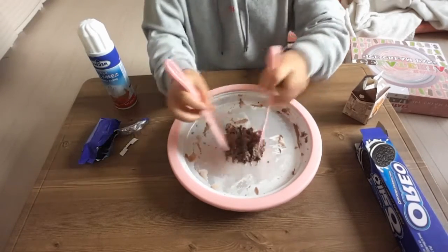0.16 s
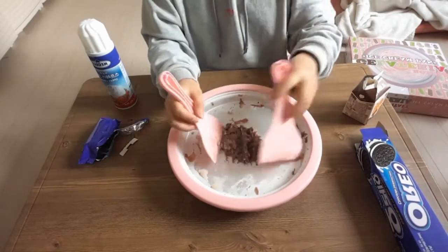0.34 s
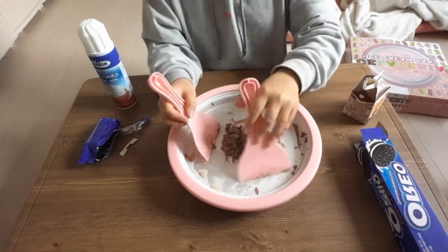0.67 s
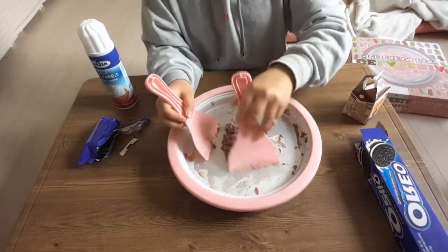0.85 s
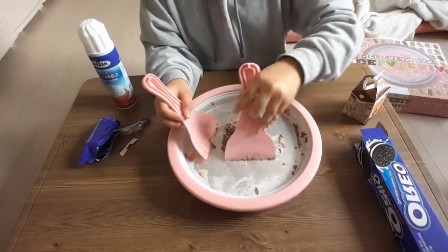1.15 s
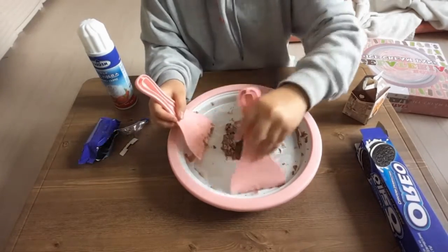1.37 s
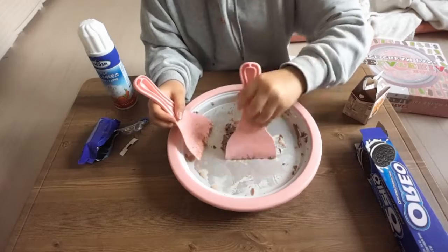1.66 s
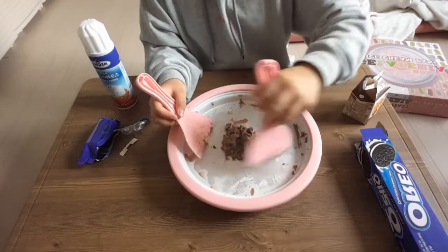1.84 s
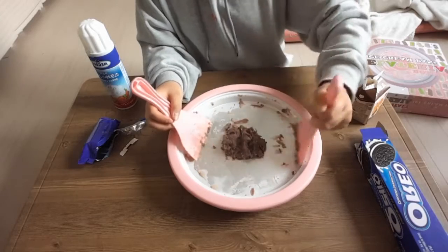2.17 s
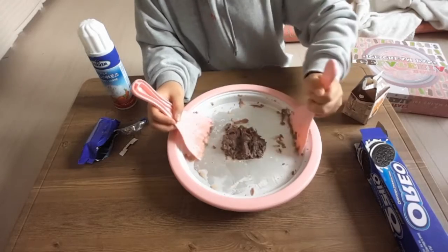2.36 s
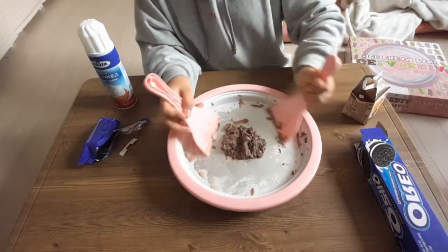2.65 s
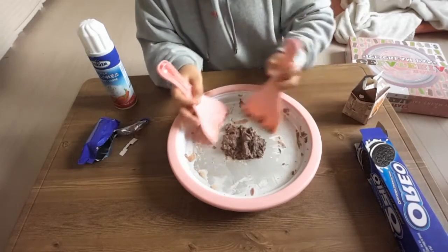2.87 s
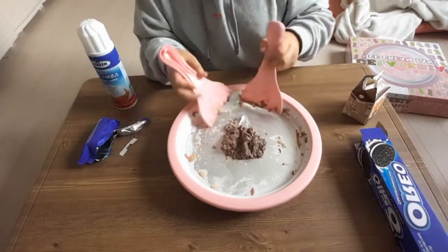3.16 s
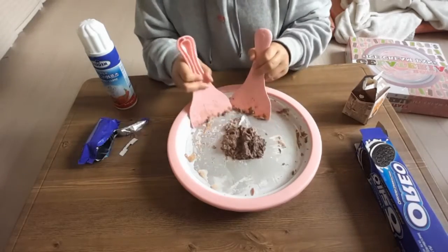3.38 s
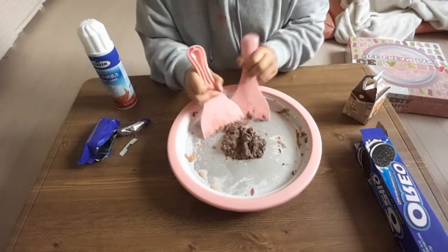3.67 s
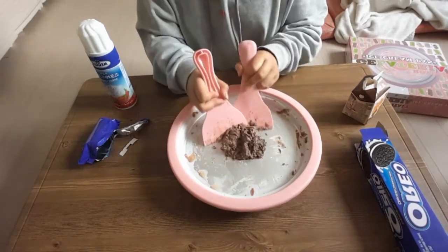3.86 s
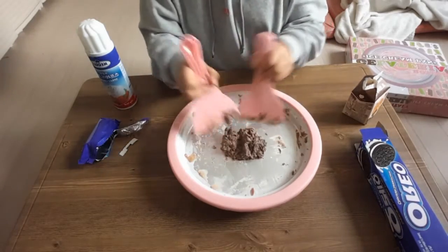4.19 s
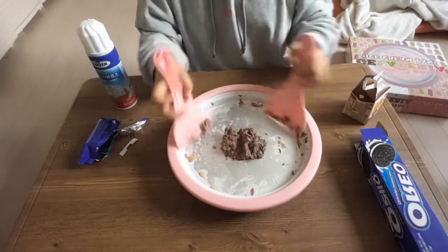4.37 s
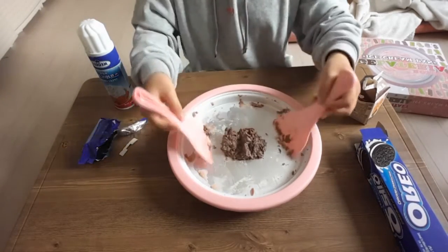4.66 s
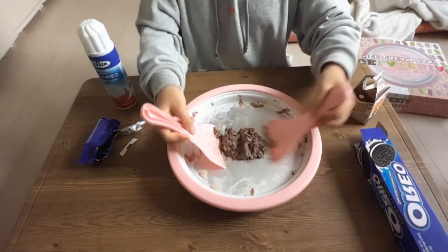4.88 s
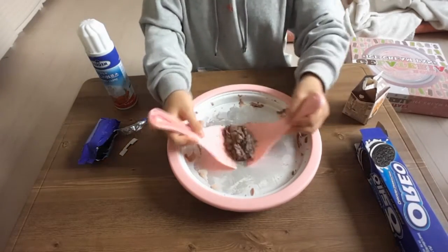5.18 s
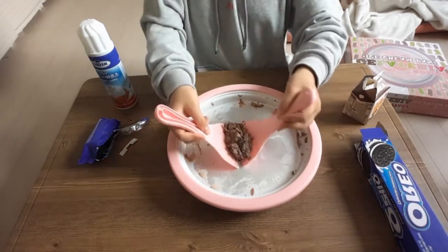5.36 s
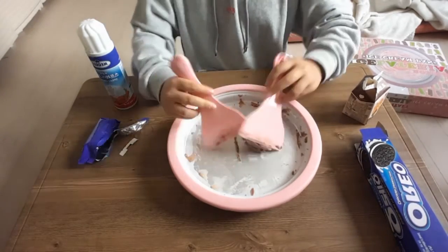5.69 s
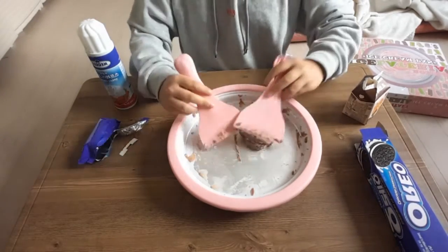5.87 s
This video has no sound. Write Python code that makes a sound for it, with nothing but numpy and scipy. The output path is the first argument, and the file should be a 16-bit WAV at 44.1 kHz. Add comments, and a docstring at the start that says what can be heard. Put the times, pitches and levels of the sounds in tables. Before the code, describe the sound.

Close microphone in a small furnished room with quiet air. Two hard plastic chops open, knocking a cold metal plate and booming the hollow tub on a wooden table. Faint frosty scrapes follow, then firmer clacks with crisp ice cracks, a busy run of taps and rasps, and finally very soft strokes with one light tap near the end.

```python
"""Close microphone in a small furnished room: two plastic spatulas work a frozen dessert mix on a tub's cold plate.
Over quiet air, two hard chops open: blades clack, ice cracks and the hollow tub booms on its wooden table.
Light strokes follow, their edges rasping through frost in slips and catches, then firmer chops near 1.7-2.9 s.
Quicker mixed taps and scrapes run to about 4.9 s, then soft strokes and a tap just before the end.
Filtered noise makes frost, ice and air; decaying sines ring plate and tub; damped bands voice the blades."""
import sys
import numpy as np
from scipy import signal
from scipy.fft import rfft, irfft
from scipy.io import wavfile

SR = 44100
rng = np.random.default_rng(int(sys.argv[2]) if len(sys.argv) > 2 else 0)


def store_pcm(level_fs):
    """Save levels as 16-bit WAV."""
    pcm = np.round(np.clip(level_fs, -1, 1) * 32767).astype(np.int16)
    wavfile.write(sys.argv[1], SR, np.atleast_2d(pcm).T)


N = 265923
TIME = np.arange(N) / SR   # seconds

# Blades striking the plate; levels are before the trims in blow().
# Each row: start in seconds [s], blade level [dB], blade pitch [Hz], blade bandwidth [octaves],
# plate knock level [dB], knock pitch of the spot struck [Hz], ice crack level [dB].
BLADE_KNOCKS = [(0.0217, -19, 1313, 1.23, -18.5, 580, -39), (0.1644, -19.5, 1583, 2.31, -20, 355, -36),
                (0.608, -43.5, 1860, 1.1, -47, 610, -73), (0.856, -47.5, 2130, 0.48, -49, 445, -48.5),
                (1.6703, -30.5, 1586, 0.53, -32.5, 383, -45), (1.791, -22.5, 1500, 1.3, -33, 940, -40.5),
                (1.8329, -28.5, 1220, 0.99, -58, 970, -42), (1.845, -33, 1660, 1.9, -40, 960, -65),
                (2.02, -57, 3080, 1.84, -76, 403, -73), (2.207, -45, 1640, 1.3, -43.5, 414, -54),
                (2.3305, -18, 1437, 1.2, -24, 540, -32.5), (2.404, -39.5, 2400, 0.97, -53, 620, -51),
                (2.445, -36.5, 2080, 0.91, -48, 390, -63), (2.465, -26, 1940, 0.93, -34, 430, -53),
                (2.514, -29.5, 1896, 0.44, -34.5, 376, -42.5),
                (2.7678, -16.5, 2450, 0.35, -34.5, 388, -26.5),
                (2.7935, -16.5, 2560, 0.69, -30, 378, -19.5), (2.8645, -19, 2680, 0.69, -45.5, 437, -26.5),
                (2.87, -23.5, 2430, 0.49, -35.5, 422.5, -27), (3.1923, -46.5, 1990, 2.3, -54.5, 885, -67),
                (3.2663, -33, 1520, .55, -46.5, 660, -59), (3.3372, -43, 1680, 0.4, -55.5, 490, -57.5),
                (3.419, -36, 1870, 0.32, -44, 840, -43), (3.4952, -42, 1586, 1.5, -42, 660, -61),
                (3.5547, -30.5, 2260, 0.95, -38.5, 450, -34.5), (3.592, -24, 2049, 0.3, -40, 400, -49),
                (3.722, -35, 1820, 0.36, -50, 649.7, -42), (3.8538, -35.5, 1960, .9, -45.5, 664, -38.5),
                (3.8781, -32, 1647, 0.53, -41.5, 449.4, -38.5),
                (4.0802, -39.5, 1624, 2.9, -61, 1030, -58.5), (4.1056, -46.5, 1460, 1.46, -64, 925, -52),
                (4.252, -53.5, 1310, 2.7, -63, 453, -58), (4.4478, -48.5, 1900, 0.86, -68, 520, -70),
                (4.568, -28, 2207, 1.37, -40, 536, -33.5), (4.6494, -36.5, 2040, 0.95, -42.5, 425, -46.5),
                (4.728, -41.5, 1360, 1.27, -42.5, 705, -56.5), (4.866, -52.5, 1498, 1.6, -51, 528, -70.5),
                (5.657, -61.5, 2570, .9, -81.5, 408.5, -56.5), (6.0224, -39.5, 2210, 1.87, -45, 417, -58)]
# Scraping strokes. Each row: middle in seconds [s], half length as the swell's standard deviation [s],
# level before the layer trims [dB], blade pitch [Hz].
SCRAPE_STROKES = [(-0.009, 0.013, -29.5, 812), (0.381, 0.044, -70, 2110), (0.627, 0.032, -51.5, 1625),
                  (0.759, 0.045, -65.5, 1830), (0.845, 0.015, -50.5, 1700), (0.948, 0.014, -56, 1680),
                  (1.038, 0.019, -50.5, 1640), (1.199, 0.031, -57.5, 1930), (1.323, 0.013, -66, 1840),
                  (1.503, 0.02, -73.5, 1900), (1.784, 0.043, -47.5, 1860), (1.865, 0.025, -47, 1780),
                  (2.312, 0.058, -54, 1700), (2.487, 0.017, -45.5, 1800), (2.681, 0.098, -67.5, 1700),
                  (2.884, 0.02, -38.5, 1852), (3.098, .05, -55, 1760), (3.196, 0.024, -56, 1673),
                  (3.313, 0.048, -59.5, 1730), (3.565, .05, -47, 1680), (3.753, 0.031, -47, 1530),
                  (3.91, 0.034, -38, 1760), (3.997, 0.043, -47.5, 1640), (4.12, 0.093, -64, 1400),
                  (4.447, 0.035, -61, 1890), (4.663, .02, -49, 1765), (4.818, 0.059, -59.5, 1503),
                  (5.108, 0.05, -56.5, 1600), (5.208, .025, -57.5, 2660), (5.412, 0.096, -59.5, 2130),
                  (5.955, 0.084, -77, 1600)]
# Shoves of the tub against the table. Each row: start in seconds [s], level before the boom trim [dB],
# boom pitch [Hz].
TUB_SHOVES = [(0.001, -17, 144.4), (0.167, -15.5, 139.8), (0.283, -33.5, 128.3), (0.572, -46, 147),
              (1.317, -46.5, 164.5), (1.722, -37, 121.6), (2.215, -43, 135), (2.464, -34, 149),
              (2.64, -40, 142.5), (2.797, -33, 144), (2.874, -31, 144.4), (3.51, -46.5, 169),
              (3.879, -28, 148.4), (3.975, -39, 143), (4.175, -45.5, 157.6), (4.644, -47, 136.5),
              (5.132, -38, 149.8)]
# Ringing modes of the metal plate. Each row: pitch [Hz], relative strength [dB].
PLATE_RINGING = [(313, 5.5), (350, -0.5), (395, -2), (484, -3.5), (528, -3), (608, -12), (730, 5),
                 (811, -8.5), (968, -1), (1057, -2)]
# Dead knock of the loaded plate. Each row: frequency [Hz], relative spectrum level [dB per Hz].
PLATE_KNOCK_SPECTRUM = [(60, -15.5), (190, -9.5), (310, -8.5), (400, 2), (620, -12), (780, -4.5),
                        (970, 1.5), (1200, -10), (2500, -45)]
# Cracking ice. Each row: frequency [Hz], relative spectrum level [dB per Hz].
ICE_CRACK_SPECTRUM = [(1200, -30.5), (3000, 4), (4300, 2), (5200, 0.5), (6200, -4), (8000, -6),
                      (10000, -11.5), (14000, -13)]
# Rasp of a rubbing blade. Each row: frequency [Hz], relative spectrum level [dB per Hz].
BLADE_RASP_SPECTRUM = [(400, -21.5), (850, -8), (1250, -4.5), (1700, -3.5), (2100, -15), (2700, -2.5),
                       (3700, -7.5), (5000, -14.5), (8000, -39)]
# Hiss of frost under the edge. Each row: frequency [Hz], relative spectrum level [dB per Hz].
FROST_HISS_SPECTRUM = [(1500, -28.5), (3200, 1), (4300, -2), (6000, -2.5), (8000, -4.5), (10000, -10),
                       (14000, -55.5)]
# Quiet air of the room. Each row: frequency [Hz], relative spectrum level [dB per Hz].
ROOM_AIR_SPECTRUM = [(20, -5), (45, -15), (70, -4), (140, 4), (220, -5.5), (400, -6), (800, -11.5),
                     (2000, -13), (4000, -17), (6500, -24.5), (10000, -28)]
# Tone of the microphone. Each row: frequency [Hz], gain [dB].
MICROPHONE_TONE = [(100, 3), (6600, -2.5), (7600, 7.5), (9600, 6), (10100, -1.5), (10550, -2)]

ROOM_AIR_DB = -67.5
ROOM_T60_S, ROOM_DB, TABLE_ECHO_DB = .26, -8.5, -6.5   # echo energies relative to the direct sound
CUTOFF_HZ = 10350   # upper edge of the microphone's band
PLATE_T60_S, TUB_T60_S = .17, .17
KNOCK_S = .005   # span that sets the scale of blow levels
# A flat blow that loads the plate lands twice: first the corner, then the whole edge.
SETTLE_S, SETTLE_DB = .0032, -4.5
# A steeper, stiffer grip raises the blade's pitch, shaves more frost and shakes the plate less.
GRIP_HZ = 1700
HISS_DB, HISS_DB_PER_OCTAVE = -6.5, 12.5
RUMBLE_DB, RUMBLE_DB_PER_OCTAVE = -5, -6
# The edge catches on frozen crumbs during a stroke; plate and crack levels are relative to each catch.
CATCHES_PER_S, CATCH_DB, CATCH_SPREAD_DB = 24, 4, 2.5
CATCH_OCTAVES, CATCH_PLATE_DB, CATCH_SPOT_HZ, CATCH_CRACK_DB = 1.1, -9.5, 583, -7.5
PUSH_S = .0038   # length of a shove
# A hard shove lifts the tub, and it drops back; gentler shoves rock it less.
ROCK_BACK_S, ROCK_BACK_DB = .029, -4
HARD_SHOVE_DB, ROCK_DB_PER_DB = -19, .5


def from_db(db):
    """Decibels to gain."""
    return 10 ** (np.asarray(db) / 20)


def unit_energy(x):
    """Scale so that the squares sum to one."""
    return x / np.sqrt(np.sum(x ** 2) + 1e-20)


def add(track, s, sound):
    """Mix a sound into the track from time s, kept inside the track."""
    start = int(np.clip(round(s * SR), 0, N - 1))
    track[start:start + len(sound)] += sound[:N - start]


def through(x, response):
    """Pass a signal through an impulse response, keeping its length."""
    return signal.fftconvolve(x, response)[:len(x)]


def response_of(spectrum, size=4096):
    """Causal, minimum-phase impulse response with the given spectrum."""
    hz, db = np.transpose(spectrum)
    grid = np.maximum(np.linspace(0, SR / 2, size // 2 + 1), 1)
    grid_db = np.interp(np.log(grid), np.log(hz), db)
    cepstrum = irfft(np.log(from_db(grid_db)))
    # Folding the cepstrum onto positive time gives minimum phase.
    cepstrum[1:size // 2] *= 2
    cepstrum[size // 2 + 1:] = 0
    return irfft(np.exp(rfft(cepstrum)))


def dying(t, t60):
    """Gain that falls by 60 dB in t60 seconds."""
    return np.exp(-np.log(1000) * t / t60)


def band(x, hz, octaves):
    """A heavily damped resonance passes a band around its pitch."""
    half = 2 ** (np.clip(octaves, .2, 3) / 2)
    sos = signal.butter(2, [hz / half, hz * half], "band", fs=SR, output="sos")
    return signal.sosfilt(sos, x + 1e-18)


def room(x, near_t60=.056, near_delay=.0031, wall_delay=.013):
    """Quick scatter from rim, table and boxes, then a short diffuse tail, drawn anew for each sound's spot."""
    t = TIME[:SR // 3]
    near = unit_energy(rng.standard_normal(len(t)) * dying(t, near_t60) * (t > near_delay))
    tail = unit_energy(rng.standard_normal(len(t)) * dying(t, ROOM_T60_S) * (t > wall_delay))
    direct = signal.unit_impulse(len(t))
    return signal.fftconvolve(x, direct + from_db(TABLE_ECHO_DB) * near + from_db(ROOM_DB) * tail)


def room_air():
    """Steady noise, shaped by the air's spectrum, lies under the whole scene."""
    air = through(rng.standard_normal(N), unit_energy(response_of(ROOM_AIR_SPECTRUM)))
    return from_db(ROOM_AIR_DB) * air


def slips(size, per_s, spread_db):
    """Sudden releases of the sticking edge, at uneven moments and of uneven force."""
    released = rng.random(size) < per_s / SR
    return released * from_db(spread_db * np.minimum(rng.exponential(1, size), 3))


def grit(size, slips_per_s=190, slip_t60=.004, slip_db=2.0, glide=.14):
    """Friction force, rms 1: every slip breaks a cluster of crystals over the steady glide."""
    slip_decay = dying(TIME[:SR // 30], slip_t60)
    breaking = glide + through(slips(size, slips_per_s, slip_db), slip_decay)
    return unit_energy(breaking * rng.standard_normal(size)) * np.sqrt(size)


def chatter(swell, hz, slips_per_s=220, spread_db=3, step_octaves=.44, ring_octaves=.36):
    """Slips flick the blade; its pitch shifts as the left, middle or right of the edge catches."""
    out = 0
    for shift, weight in ((-2.0, .21), (-.3, .93), (1, .36)):
        pitch = hz * 2 ** (shift * step_octaves)
        flick = unit_energy(band(signal.unit_impulse(SR // 30), pitch, ring_octaves))
        releases = unit_energy(slips(len(swell), slips_per_s, spread_db))
        out = out + weight * through(swell * releases, flick)
    return out * np.sqrt(len(swell))


def plate_response(ring_db=-4, spot_db=2):
    """A dead knock of the loaded plate, then its weaker modes, whose strengths depend on the spot touched."""
    t = TIME[:SR // 5]
    hz, db = np.transpose(PLATE_RINGING)
    strength = from_db(db + spot_db * rng.standard_normal(len(hz)))
    strength = strength * rng.choice([-1, 1], len(hz))
    modes = np.sin(2 * np.pi * hz[:, None] * t) * dying(t, PLATE_T60_S)
    out = from_db(ring_db) * unit_energy(strength @ modes)
    add(out, 0, unit_energy(response_of(PLATE_KNOCK_SPECTRUM)))
    return unit_energy(out)


def scrapes(chatter_db=-2.0, rasp_db=-3, fine_frost_db=1):
    """Each stroke swells and fades; friction shakes blade and plate, and fine frost hisses under the edge."""
    out, t = np.zeros(N), TIME[:3 * SR // 4]
    rasp_response = unit_energy(response_of(BLADE_RASP_SPECTRUM))
    frost_response = unit_energy(response_of(FROST_HISS_SPECTRUM))
    powder_gain = from_db(fine_frost_db)
    for middle, half_length, level, hz in SCRAPE_STROKES:
        start = max(middle - 3 * half_length, 0)
        swell = np.exp(-.5 * ((t + start - middle) / half_length) ** 2)
        grip = np.log2(hz / GRIP_HZ)   # octaves above the reference grip
        force = swell * grit(len(t))
        powder = swell * powder_gain * rng.standard_normal(len(t))
        stroke = from_db(chatter_db) * chatter(swell, hz)
        stroke += from_db(rasp_db) * through(force, rasp_response)
        stroke += from_db(RUMBLE_DB + RUMBLE_DB_PER_OCTAVE * grip) * through(force, plate_response())
        hiss = through(force + powder, frost_response) / np.hypot(1, powder_gain)
        stroke += from_db(HISS_DB + HISS_DB_PER_OCTAVE * grip) * hiss
        add(out, start, from_db(level) * room(stroke))
    return out


def blade_clack(drive, hz, octaves, ring_db=-10, ring_t60=.021, pair_octaves=.13):
    """The pressed blade clacks in a broad band, then rings briefly in a close pair of bending modes."""
    t = TIME[:len(drive)]
    pair = hz * 2 ** (pair_octaves * np.array([[-.5], [.5]]))
    phase = rng.uniform(0, 2 * np.pi, (2, 1))
    ring = np.sin(2 * np.pi * pair * t + phase).sum(axis=0) * dying(t, ring_t60)
    clack = unit_energy(band(drive, hz, octaves))
    return unit_energy(clack + from_db(ring_db) * unit_energy(band(ring, hz, octaves)))


def blow(blade_level, blade_hz, octaves, plate_level, spot_hz, crack_level, crush_t60=.021,
         blade_crush_db=-8, crack_crush_db=5, plate_db=-5, spot_db=-2, spot_octaves=1.0, crack_db=2.5):
    """A sharp contact and briefly crushing ice sound the blade and the cracking frost; the plate knocks."""
    t = TIME[:SR // 20]
    contact = signal.unit_impulse(len(t))
    # Crushing begins one blade period after contact.
    crush = unit_energy(rng.standard_normal(len(t)) * dying(t, crush_t60) * (t > 1 / blade_hz))
    blade = blade_clack(contact + from_db(blade_crush_db) * crush, blade_hz, octaves)
    ice_drive = contact + from_db(crack_crush_db) * crush
    ice = unit_energy(through(ice_drive, response_of(ICE_CRACK_SPECTRUM)))
    spot = unit_energy(band(contact, spot_hz, spot_octaves))
    out = from_db(plate_level + plate_db) * plate_response()
    add(out, 0, from_db(plate_level + spot_db) * spot)
    add(out, 0, from_db(blade_level) * blade + from_db(crack_level + crack_db) * ice)
    return room(out) * np.sqrt(KNOCK_S * SR)   # unit energy becomes rms 1 over KNOCK_S


def catches(reach=1.4, pitch_spread_octaves=.25, firm_db=-50, follow=.91):
    """Small uneven blows along each stroke, tending stronger at its middle; they stand out in light strokes."""
    out = np.zeros(N)
    for middle, half_length, level, hz in SCRAPE_STROKES:
        count = max(int(round(2 * reach * half_length * CATCHES_PER_S)), 1)
        for k in range(count):
            place = reach * (2 * (k + rng.random()) / count - 1)   # in half lengths from the middle
            pressure_db = 20 * np.log10(np.exp(-.5 * place ** 2))
            db = firm_db + follow * (level - firm_db) + CATCH_DB + pressure_db
            db += CATCH_SPREAD_DB * rng.standard_normal()
            pitch = hz * 2 ** (pitch_spread_octaves * rng.standard_normal())
            hit = blow(db, pitch, CATCH_OCTAVES, db + CATCH_PLATE_DB, CATCH_SPOT_HZ, db + CATCH_CRACK_DB)
            add(out, middle + place * half_length, hit)
    return out


def thumps(boom_db=-1, shove_db=-4, shove_hz=95, shove_t60=.028,
           rumble_db=-16, rumble_hz=140, rumble_octaves=1.1, rumble_t60=.41):
    """A soft push rocks the table top, sets the hollow tub booming and leaves a low rumble in the room."""
    out, t = np.zeros(N), TIME[:SR // 2]
    table = from_db(shove_db) * np.sin(2 * np.pi * shove_hz * t) * dying(t, shove_t60)
    push = np.sin(np.pi * np.minimum(t / PUSH_S, 1))   # one half sine
    push = push / push.sum()
    for s, db, hz in TUB_SHOVES:
        boom = np.sin(2 * np.pi * hz * t) * dying(t, TUB_T60_S)
        rock_db = ROCK_BACK_DB + ROCK_DB_PER_DB * min(db - HARD_SHOVE_DB, 0)
        for start, level in ((s, db), (s + ROCK_BACK_S, db + rock_db)):
            noise = unit_energy(band(rng.standard_normal(len(t)), rumble_hz, rumble_octaves))
            rumble = noise * np.sqrt(len(t)) * dying(t, rumble_t60)
            thump = through(boom - table + from_db(rumble_db) * rumble, push)
            add(out, start, from_db(level + boom_db) * thump)
    return out


def knocks():
    """Chops and taps of the two spatulas; each settles onto its whole edge an instant later."""
    out = np.zeros(N)
    for s, blade_level, blade_hz, octaves, plate_level, spot_hz, crack_level in BLADE_KNOCKS:
        # The second landing is weaker where the plate is loaded less than the blade.
        settle_db = SETTLE_DB + min(plate_level - blade_level, 0)
        for start, db in ((s, 0), (s + SETTLE_S, settle_db)):
            hit = blow(blade_level + db, blade_hz, octaves, plate_level + db, spot_hz, crack_level + db)
            add(out, start, hit)
    return out


def scene():
    """Quiet air, strokes and blows with their room echoes, and the boom of the tub, as one channel."""
    return (room_air() + scrapes() + catches() + thumps() + knocks())[None, :]


def record(dry, low_cut_hz=45):
    """The microphone drops the deep bass and lifts the bright top, then the band ends steeply."""
    low_cut = signal.butter(2, low_cut_hz, "high", fs=SR, output="sos")
    lean = signal.sosfilt(low_cut, dry[0])
    bright = through(lean, response_of(MICROPHONE_TONE))
    band_end = signal.ellip(8, .5, 60, CUTOFF_HZ, fs=SR, output="sos")
    return signal.sosfilt(band_end, bright)[None, :]


dry = scene()
out = record(dry)
store_pcm(out)
```